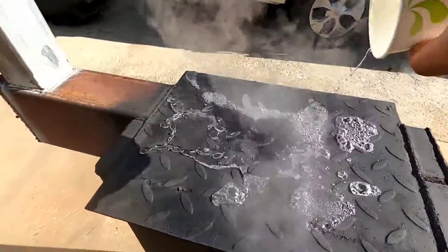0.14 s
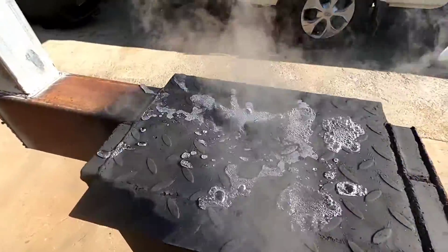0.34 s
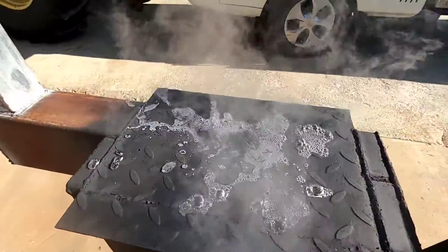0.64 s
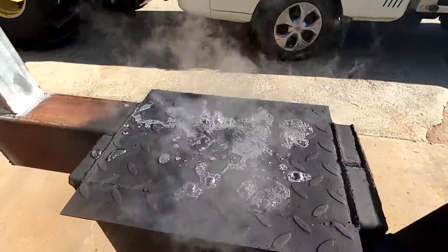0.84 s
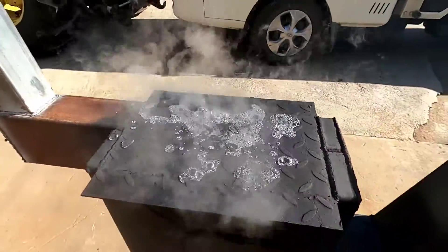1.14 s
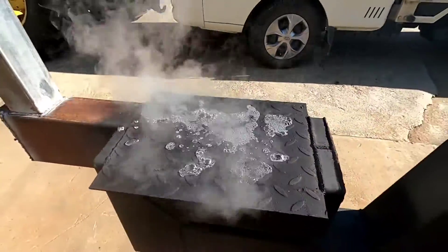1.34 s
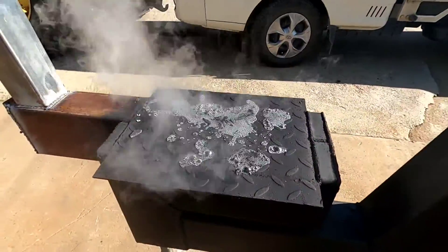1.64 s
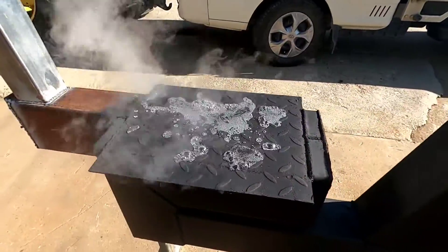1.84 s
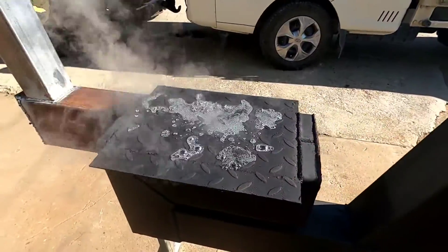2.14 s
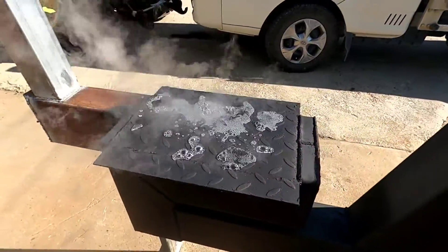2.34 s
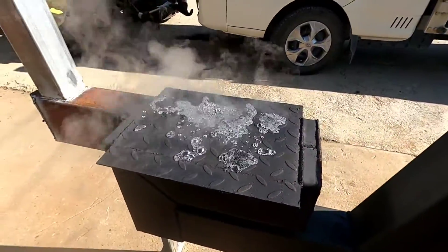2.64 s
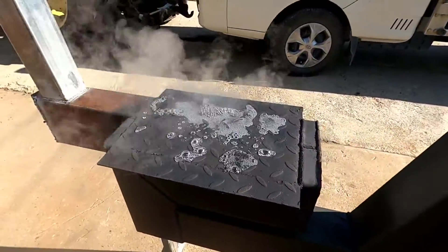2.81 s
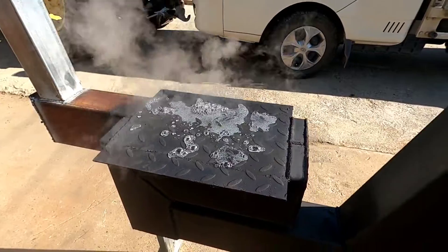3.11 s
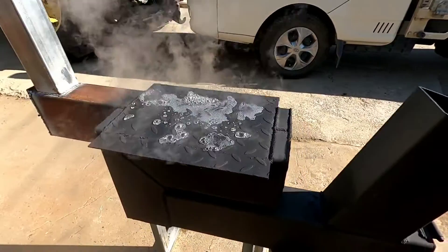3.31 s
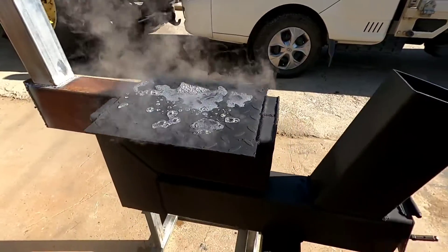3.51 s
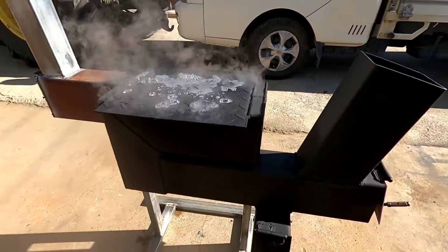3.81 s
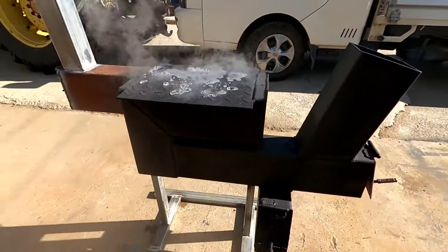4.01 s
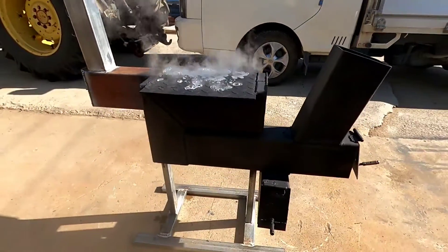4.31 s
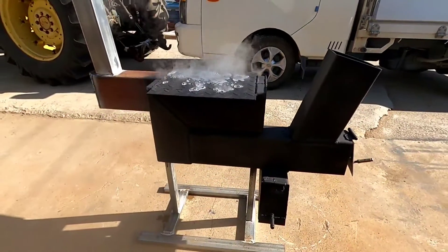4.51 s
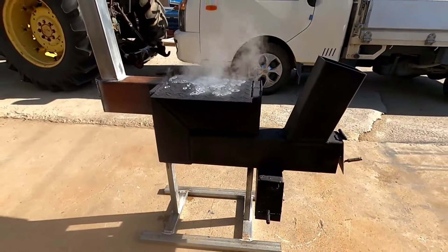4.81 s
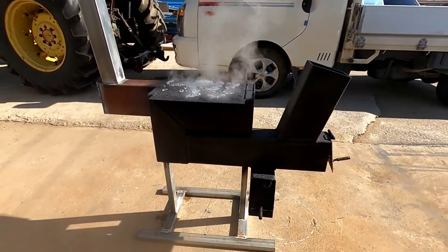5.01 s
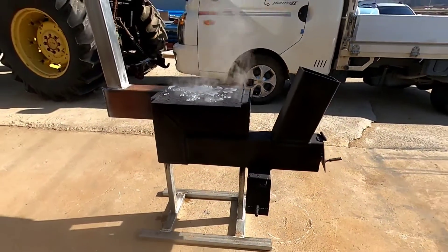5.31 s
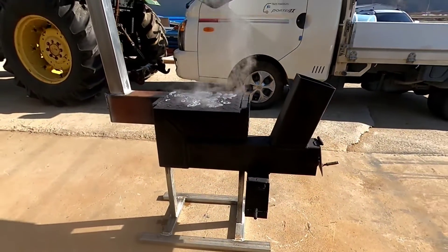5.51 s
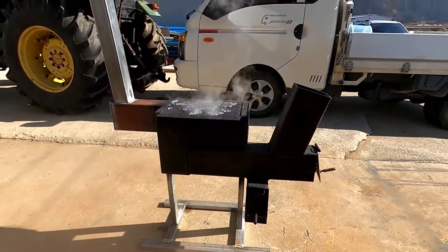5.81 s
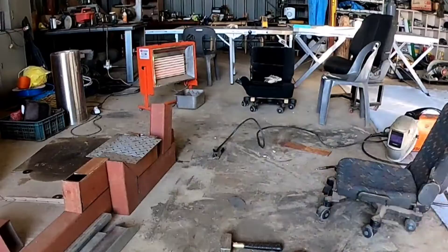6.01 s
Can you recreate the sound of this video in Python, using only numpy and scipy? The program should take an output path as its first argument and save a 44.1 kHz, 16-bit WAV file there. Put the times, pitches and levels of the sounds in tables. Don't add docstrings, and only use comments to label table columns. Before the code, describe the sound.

Close outdoors, water boils on a hot steel stove top: a dense, bubbling, crackling sizzle. Soft shoe knocks tap early, a brief gritty scuff comes near two seconds, then firmer steps. The stereo microphone backs away, so the sizzle thins and quietens while a faint low flue hum and air buffeting grow. It cuts abruptly to a split-second rasp of a grinder on steel in a workshop, then silence.

```python
import sys
import numpy as np
from scipy import signal
from scipy.fft import rfft, irfft, next_fast_len
from scipy.io import wavfile
from scipy.ndimage import map_coordinates

SR = 44100
rng = np.random.default_rng(int(sys.argv[2]) if len(sys.argv) > 2 else 0)


def how_loud(loudness_db):
    steps = np.asarray(loudness_db, float) / 20
    return 10 ** steps


def to_wav(sig):
    pcm = np.clip(np.atleast_2d(sig), -1, 1) * 32767
    pcm = np.round(pcm).astype(np.int16)
    wavfile.write(sys.argv[1], SR, pcm.T)


N = 271215

# (time [s], level [dB], share of large bubbles [dB])
BOILING = [(0.0, -39.5, -3.5), (0.2, -41, -5), (0.46, -40.5, -3), (0.63, -40.5, -1.5), (0.91, -39, -3),
           (1.04, -41, -0.5), (1.18, -40, -3.5), (1.38, -41.5, 0.5), (1.48, -43.5, -0.5), (1.73, -43, -2.5),
           (1.96, -40.5, -4.5), (2.32, -42, -4.5), (2.97, -42, -5), (3.3, -43, -3.5), (3.65, -44.5, -4.5),
           (4.48, -47.5, -8.5), (4.86, -51, -6), (5.64, -54, -6.5)]
# (frequency [Hz], density [dB per Hz])
PLATE_COLOUR = [(290, -18), (500, -12), (706, -15.5), (982, -10), (1180, -4.5), (1600, -2), (2760, -2),
                (3370, -3), (5500, -9), (6400, -7.5), (7600, -13.5), (11600, -21), (14400, -31.5),
                (15400, -37.5)]
# (frequency [Hz], coherence [0-1])
NEAR_COHERENCE = [(60, 0.86), (92, 0.76), (140, 0.76), (210, 0.79), (330, 0.87), (500, 0.91), (770, 0.99),
                  (1170, 1), (1790, 0.92), (2740, 1), (4190, 0.91), (6410, 0.9), (9800, 0.59),
                  (15000, 0.71)]
# (frequency [Hz], coherence [0-1])
FAR_COHERENCE = [(60, 0.93), (110, 0.97), (200, 0.8), (380, 0.74), (700, 0.7), (1290, 0.56), (2380, 0.94),
                 (4400, 1), (8120, 0.96), (15000, 0.68)]
# (frequency [Hz], share [0-1])
SHADED_BANDS = [
    [(700, 0.034), (1200, 0.6), (2800, 1), (4000, 0.13)],
    [(2800, 0.055), (4000, 1), (6500, 0.95), (8500, 0.14)],
]
# (centre [Hz], width [Hz], gain [dB])
PORT_RESONANCES = [
    (8290, 570, -5),
    (8940, 330, 3),
]
# (time [s], left-right difference [dB])
TURNING = [
    (0.3, -2),
    (1.0, 0.8),
    (3.55, 0.9),
    (5.76, 3),
]
# (time [s], distance [0-1])
RETREATING = [
    (0, 0.06),
    (3.2, 0.14),
    (4.4, 0.61),
    (5.9, 0.94),
]
# (start [s], stop [s], edge [s], spray gain [dB], drumming gain [dB])
PUDDLE_SPREAD = (0.7, 1.2, .015, 2, 2.5)
# (time [s], peak [dB], sole pitch [Hz], slap [dB], 60 dB decay [s])
SHOE_CONTACTS = [(0.101, -46.5, 184, -5, 0.052), (0.143, -48, 266, -2.5, 0.031),
                 (0.385, -47, 147, -14, 0.034), (0.489, -44, 155, 0, 0.024), (0.809, -46, 500, -4, 0.037),
                 (0.815, -45.5, 332, 5, 0.025), (0.942, -48.5, 185, -2, 0.033),
                 (1.968, -41.5, 187, -6, 0.024), (1.983, -52.5, 207, -3, 0.032),
                 (2.004, -47.5, 175, -6, 0.036), (4.013, -35, 284.5, -19, 0.031),
                 (4.028, -39.5, 360, -14.5, 0.026), (4.995, -41.5, 287, -18, 0.037),
                 (5.014, -46, 227, 11.5, 0.0086), (5.024, -45, 352, -19, 0.022),
                 (5.276, -56, 143.6, -11, 0.027)]
# (time [s], peak [dB])
GRIT_CRACKS = [
    (1.9706, -34),
    (1.9798, -31),
    (1.9868, -33),
    (1.9946, -34),
    (1.9965, -35),
    (2.0013, -27),
    (2.0062, -33),
]
# (centre [Hz], width [Hz], gain [dB])
STONE_MODES = [(2760, 1500, -8), (7250, 680, 15), (8860, 760, -11)]
# (time [s], level [dB])
SOLE_DRAG = [
    (1.955, -68),
    (1.97, -48.5),
    (1.985, -42.5),
    (2.005, -48.5),
    (2.02, -47),
    (2.04, -76.5),
]
# (frequency [Hz], density [dB per Hz])
RUBBER_COLOUR = [(100, -29), (180, -1.5), (500, -6), (1100, 2), (2500, -38.5), (6000, -33.5), (8000, -4),
                 (10000, -20), (15500, -52)]
# (time [s], level [dB])
GRINDER_LEVEL = [
    (5.988, -46),
    (5.991, -40),
    (6.005, -39),
    (6.0195, -38),
    (6.0205, -59),
    (6.0315, -72),
    (6.0325, -86),
    (6.049, -92),
]
# (frequency [Hz], density [dB per Hz])
DISC_COLOUR = [(71, -50.5), (120, -18), (518, -27.5), (1520, -12), (2060, -17), (2240, -9.5), (2530, -15),
               (3720, -11.5), (6060, -19.5), (11200, -33.5), (15400, -50)]
# (time [s], half length [s], tone [dB], pitch [Hz])
DRAUGHT_SURGES = [(0.0, 0.036, -53.5, 63.5), (0.194, .05, -62, 60.2), (0.427, 0.093, -62.5, 63.1),
                  (0.616, 0.073, -60, 62), (0.765, .07, -61.5, 61), (1.178, .05, -58.5, 55.1),
                  (1.33, .06, -62, 53), (1.533, .06, -59, 55.4), (1.648, 0.1, -58.5, 59.8),
                  (1.95, .09, -65, 60.4), (2.142, .06, -60, 61.5), (2.36, 0.039, -64.5, 60),
                  (2.517, 0.069, -65, 52), (2.722, 0.048, -69, 54), (2.982, 0.087, -75, 69),
                  (3.116, 0.047, -55.5, 63), (3.23, 0.044, -51, 56), (3.341, 0.083, -46.5, 55.9),
                  (3.48, 0.066, -58, 54.1), (3.59, 0.032, -55, 56.4), (3.727, .06, -55, 62.2),
                  (3.889, 0.18, -54.5, 62), (4.058, 0.069, -50, 59.1), (4.282, 0.2, -54.5, 58.6),
                  (4.599, .12, -49, 59.5), (4.82, 0.24, -50.5, 59.8), (4.98, 0.055, -47.5, 58.8),
                  (5.103, 0.083, -51, 60.3), (5.338, 0.24, -49, 58.5), (5.72, 0.3, -53, 57.5)]
# (frequency [Hz], wander [Hz])
FLUE_OVERTONE = (89, 5)
# (time [s], level [dB])
AIR_PUFFS = [(0.0, -57), (0.28, -63.5), (0.66, -69.5), (1.06, -65), (1.3, -65), (1.46, -53.5),
             (1.85, -65.5), (2.15, -55), (2.4, -64.5), (2.72, -70), (3.33, -56), (3.55, -57), (3.76, -53),
             (4.07, -61), (4.41, -50.5), (4.7, -60), (5.0, -57), (5.3, -55), (5.6, -61), (5.95, -52)]
# (frequency [Hz], density [dB per Hz])
RUMBLE_COLOURS = [
    [(90, -44.5), (115, 0), (190, -1), (240, -4.5), (320, -37.5)],
    [(170, -21.5), (240, -6.5), (400, 0), (520, -5.5), (650, -4), (1000, -33.5), (1500, -71)],
]
# (time [s], length [s], from [Hz], to [Hz], peak [dB])
CHIRPS = [
    (2.955, .028, 6250, 6900, -51),
]

CUT_S, END_S = 5.9885, 6.05


def boil():
    level_db, large_db = curves(BOILING)
    far = retreat()
    fine_db = -6.5 + 3.1 * far
    spray_db = -18 - 0.5 * far + PUDDLE_SPREAD[3] * spreading()
    seethe = 0.19 * wobble(9) + 0.29 * wobble(30) + 0.5 * wobble(250)
    pops = popping(per_s=450, spread_db=3, pop_db=-13)
    shared = dict(seethe=seethe, pops=pops)
    large = swarm(763, 2070, per_s=4000, cycles=1.36, spread_db=2.0, **shared)
    medium = swarm(2850, 4430, per_s=8000, cycles=1.98, spread_db=0.5, **shared)
    fine = swarm(5280, 7750, per_s=9000, cycles=2.4, spread_db=2.5, **shared)
    spray = swarm(10040, 14000, per_s=9000, cycles=2.12, spread_db=2.5, **shared)
    bubbles = how_loud(level_db + large_db) * large + how_loud(level_db) * medium
    bubbles += how_loud(level_db + fine_db) * fine + how_loud(level_db + spray_db) * spray
    near_part = (1 - far) * stereo(bubbles, ports)
    far_part = far * stereo(bubbles, ports, FAR_COHERENCE)
    return shadowed(near_part + far_part)


def swarm(lo_hz, hi_hz, per_s, cycles, spread_db, seethe, pops):
    out = 0
    for hz in np.geomspace(lo_hz, hi_hz, num=3):
        draw = rng.random((3, 2, N))
        happens = draw[0] < per_s / SR
        strength = how_loud(-spread_db * np.log(draw[1] + 1e-3))
        bursts = happens * strength * np.sign(draw[2] - 0.5)
        own_swell = 0.45 * wobble(12) + 0.45 * wobble(60)
        bursts = (unit(bursts) + pops) * how_loud(seethe + own_swell)
        ring = signal.iirpeak(hz, cycles, SR)
        out = out + signal.lfilter(*ring, signal.lfilter(*ring, bursts))
    return unit(filtered(out, lambda f: how_loud(along(PLATE_COLOUR, f))))


def popping(per_s, spread_db, pop_db):
    draw = rng.random((2, 2, N))
    strength = how_loud(-spread_db * np.log(draw[1] + 1e-2))
    return -how_loud(pop_db) * unit((draw[0] < per_s / SR) * strength)


def spreading():
    start, stop, edge = PUDDLE_SPREAD[:3]
    return curves([(start - edge, 0), (start + edge, 1), (stop - edge, 1), (stop + edge, 0)])[0]


def retreat():
    return np.clip(curves(RETREATING)[0], 0, 1)


def ports(hz):
    bumps = [db * np.exp(-((hz - centre) / width) ** 2 * 2) for centre, width, db in PORT_RESONANCES]
    top_hz = 15150
    return (hz < top_hz) * np.array([how_loud(sum(bumps)), np.ones_like(hz)])


def shadowed(sizzle):
    low_pan_db = np.full(N, 2.5)
    high_pan_db = curves(TURNING)[0]
    out = sizzle.copy()
    for band, pan_db in zip(SHADED_BANDS, [low_pan_db, high_pan_db]):
        part = filtered(sizzle, lambda hz: np.clip(along(band, hz), 0, 1.5))
        out += part * (how_loud(np.array([pan_db, -pan_db]) / 2) - 1)
    return out


def shoes():
    thuds = np.zeros(N + SR)
    t = np.arange(SR // 10) / SR
    for s, db, hz, slap_db, t60 in SHOE_CONTACTS:
        upper_mode = 0.5 * how_loud(-60 * t / 0.036) * np.sin(2 * np.pi * 1.67 * hz * t)
        sole = np.sin(2 * np.pi * hz * t) + upper_mode
        slap_modes = np.sin(2 * np.pi * 700 * t) + 0.31 * np.sin(2 * np.pi * 960 * t)
        slap = how_loud(slap_db - 60 * t / 0.0058) * slap_modes
        onset = 1 - np.exp(-t / 0.0019)
        thuds[round(s * SR):][:len(t)] += how_loud(db + 6.5) * onset * (how_loud(-60 * t / t60) * sole + slap)
    return thuds[:N] + scuff()


def scuff():
    cracks = np.zeros(N)
    for s, db in GRIT_CRACKS:
        cracks[round(s * SR)] = how_loud(db + 17)
    stones = filtered(cracks, lambda f: resonant(STONE_MODES)(f) / (1 + 1j * f / 9000) ** 4)
    return stones + how_loud(curves(SOLE_DRAG)[0]) * noise(RUBBER_COLOUR)


def grinder():
    grit = how_loud(1.5 * wobble(600)) * noise(DISC_COLOUR)
    return how_loud(curves(GRINDER_LEVEL)[0]) * filtered(grit, lambda hz: hz < 15550)


def flue():
    s, _, _, hz = np.transpose(DRAUGHT_SURGES)
    pitch_hz = np.interp(np.arange(N) / SR, s, hz)
    surge = draught()
    tone = surge * how_loud(1.9 * wobble(16)) * hum(pitch_hz + 3.19 * wobble(25))
    centre_hz, wander_hz = FLUE_OVERTONE
    overtone_hz = centre_hz + wander_hz * (wobble(30) + 0.8 * wobble(5))
    follows = (surge * 1000) ** 0.62
    overtone = follows * how_loud(-66 + 3.2 * wobble(30) + 1.9 * wobble(7)) * hum(overtone_hz)
    return (tone + overtone) * how_loud([[-0.3], [0.3]])


def draught():
    s, half_s, tone_db, _ = np.transpose(DRAUGHT_SURGES)
    return swells(s, half_s, tone_db, rest_db=-74.5)


def buffeting():
    puff = resonant([(33, 28, 0)])
    air = unit(stereo(rng.standard_normal((2, N)), lambda f: puff(f) ** 2))
    s, puff_db = np.transpose(AIR_PUFFS)
    return swells(s, 0.085, puff_db, rest_db=-64.5) * air


def rumble():
    large_db = sum(curves(BOILING))
    drumming_db = -64.5 + 0.86 * (large_db - large_db.max())
    drumming = how_loud(drumming_db + PUDDLE_SPREAD[4] * spreading())
    road = how_loud(-67.5 - 6.5 * curves(RETREATING)[0])
    flames = how_loud(-20.5) * draught()
    street = how_loud(-73)
    gains = [np.hypot(road, flames), np.hypot(drumming, street)]
    out = 0
    for gain, colour in zip(gains, RUMBLE_COLOURS):
        out = out + gain * how_loud(2.6 * wobble(12) + 1.1 * wobble(3)) * noise(colour)
    return out


def bird():
    out = np.zeros(N)
    for s, length_s, from_hz, to_hz, db in CHIRPS:
        count = round(length_s * SR)
        phase = 2 * np.pi * np.cumsum(np.linspace(from_hz, to_hz, count)) / SR
        out[round(s * SR):][:count] = how_loud(db) * np.hanning(count) * np.sin(phase)
    return out * np.array([[1], [-1]])


def unit(x):
    return x / np.sqrt(np.mean(x ** 2) + 1e-20)


def along(points, hz):
    f, v = np.transpose(points)
    return np.interp(np.log(hz + 1), np.log(f + 1), v)


def curves(rows):
    s, *cols = np.transpose(rows)
    return [np.interp(np.arange(N) / SR, s, c) for c in cols]


def wobble(rate):
    knots = rng.standard_normal(int(N * rate / SR) + 4)
    return map_coordinates(knots, [np.arange(N) * rate / SR])


def hum(hz):
    return np.sqrt(2) * np.sin(2 * np.pi * np.cumsum(hz) / SR)


def swells(times, halves_s, peaks_db, rest_db):
    t = np.arange(0, N, 64)[:, None] / SR
    bells = how_loud(peaks_db) * np.exp(-2 * ((t - times) / halves_s) ** 2)
    return np.interp(np.arange(N) / SR, t[:, 0], how_loud(rest_db) + bells.sum(axis=1))


def filtered(x, response):
    m = next_fast_len(N + SR // 4)
    return irfft(rfft(x, m) * response(np.fft.rfftfreq(m, 1 / SR)), m)[..., :N]


def resonant(modes):
    def response(f):
        total = 0
        for k, (c, w, db) in enumerate(modes):
            total = total + (-1) ** k * how_loud(db) * 1j * f * w / (c * c - f * f + 1j * f * w)
        return total
    return response


def stereo(pair, response, alike=NEAR_COHERENCE):
    def mid_side(hz):
        angle = np.arccos(np.clip(along(alike, hz), -1, 1)) / 2
        return response(hz) * [np.cos(angle), np.sin(angle)]
    mid, side = filtered(pair, mid_side)
    return np.array([mid + side, mid - side])


def noise(spectrum):
    return unit(stereo(rng.standard_normal((2, N)), lambda hz: how_loud(along(spectrum, hz))))


def scene():
    t = np.arange(N) / SR
    yard = boil() + shoes() + flue() + buffeting() + rumble() + bird()
    yard = yard * np.clip((CUT_S - t) / 0.002 + 1, 0, 1)
    return yard + grinder() * ((t > CUT_S) & (t < END_S))


def band_limit(x):
    return signal.sosfilt(signal.butter(12, 15160, fs=SR, output="sos"), x)


def record(dry):
    return band_limit(dry)


dry = scene()
out = record(dry)
to_wav(out)
```